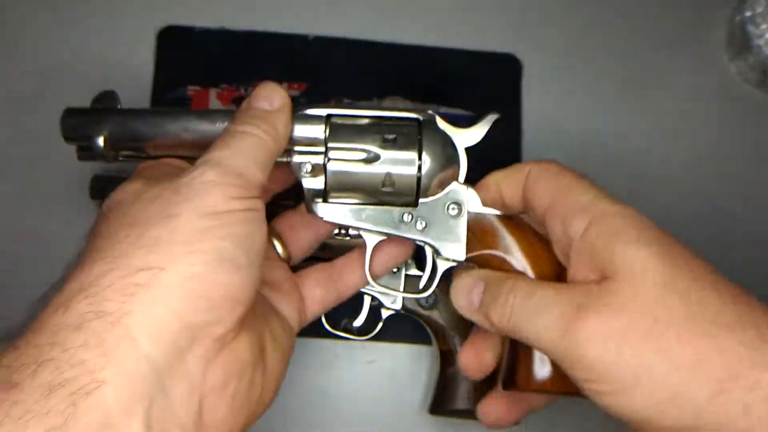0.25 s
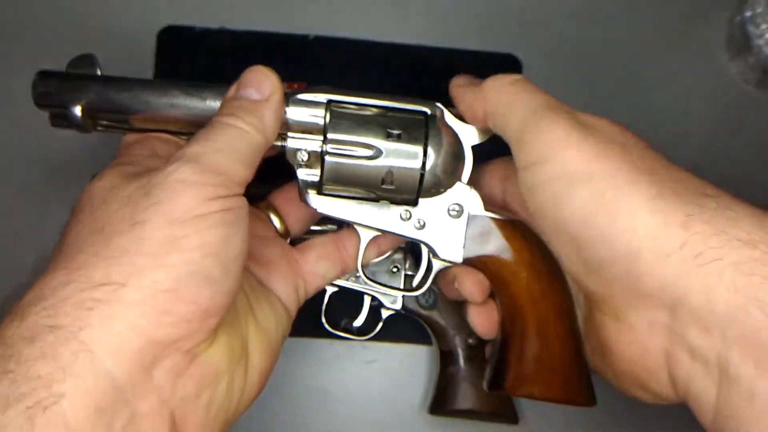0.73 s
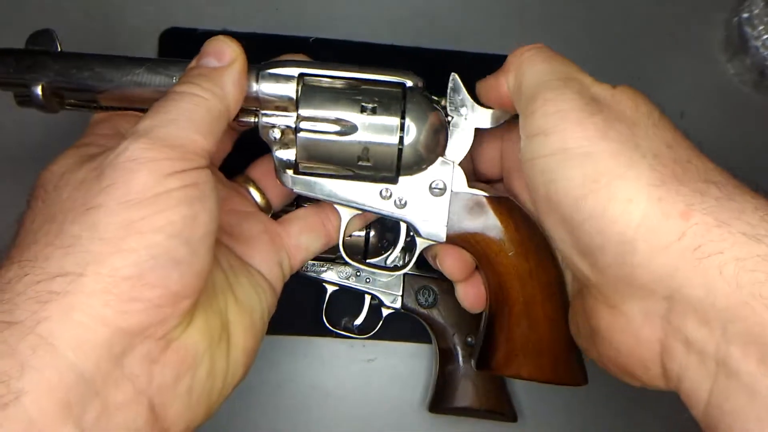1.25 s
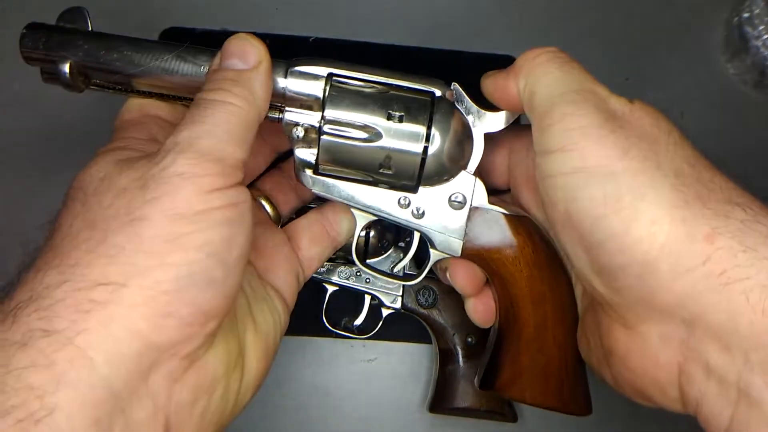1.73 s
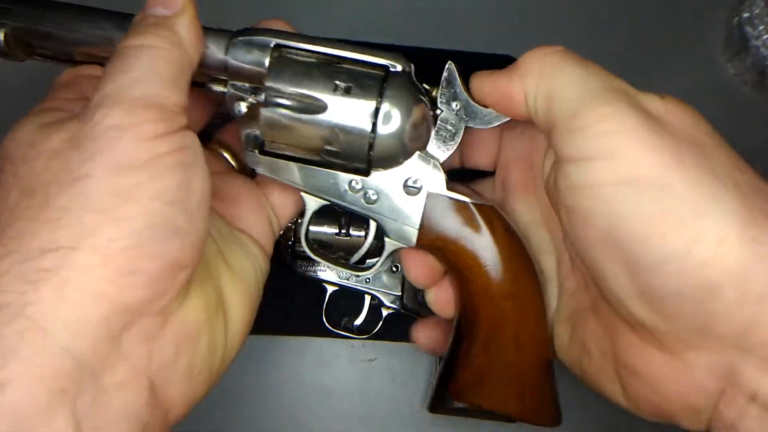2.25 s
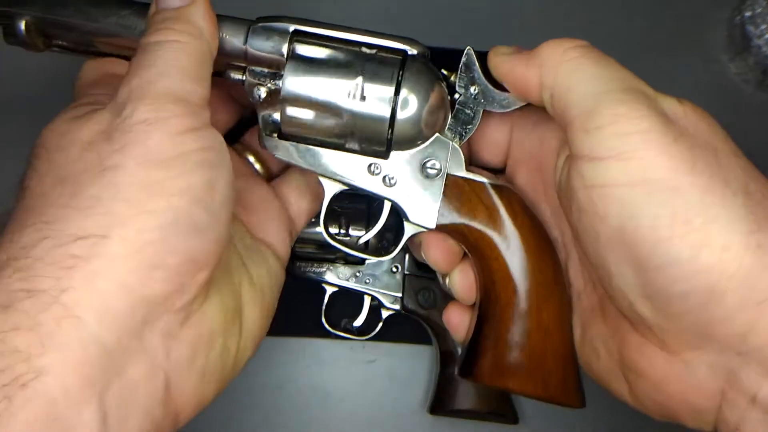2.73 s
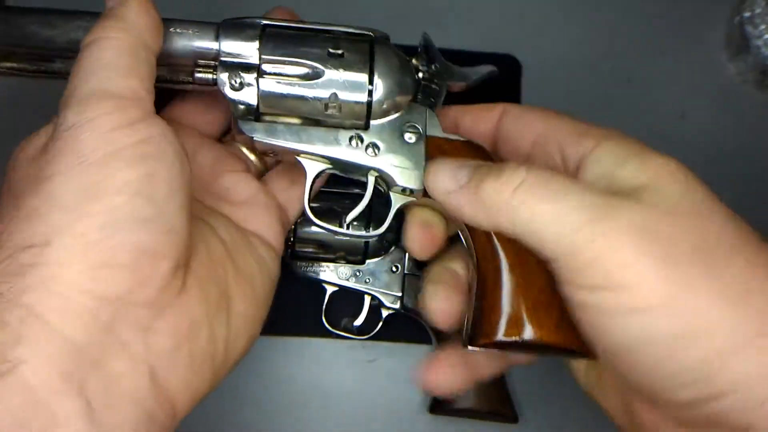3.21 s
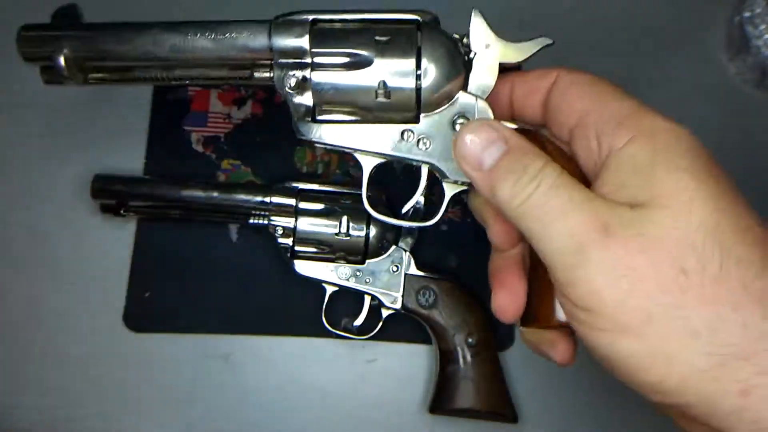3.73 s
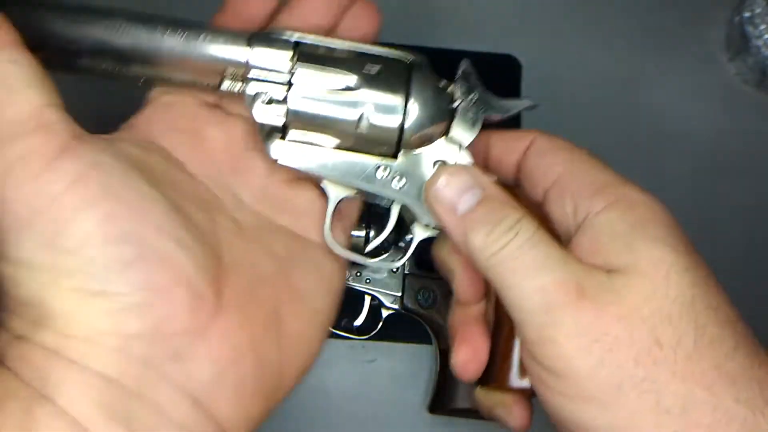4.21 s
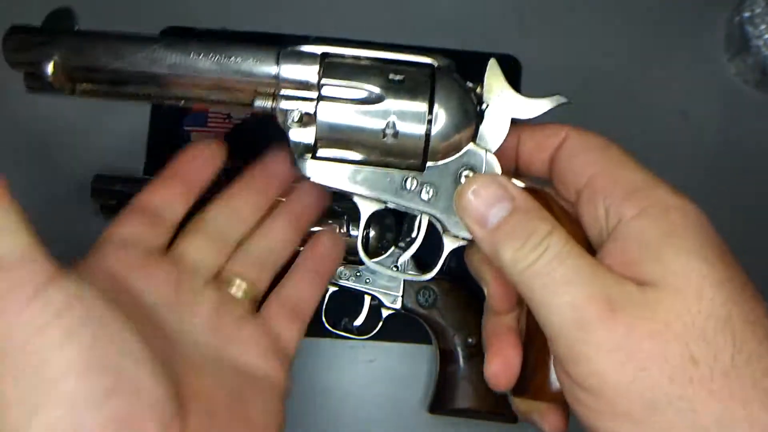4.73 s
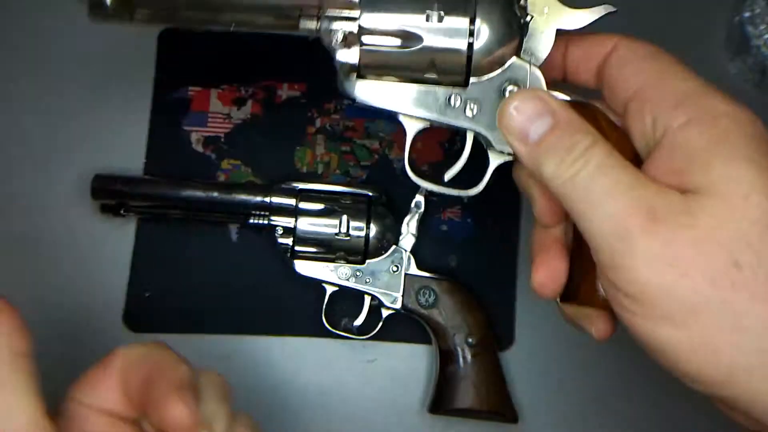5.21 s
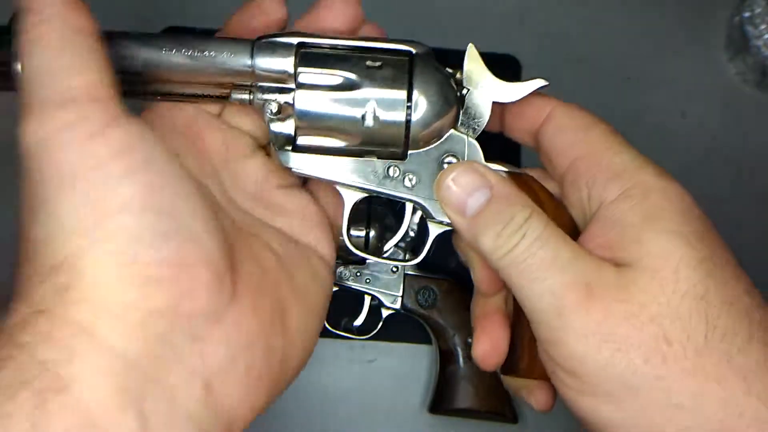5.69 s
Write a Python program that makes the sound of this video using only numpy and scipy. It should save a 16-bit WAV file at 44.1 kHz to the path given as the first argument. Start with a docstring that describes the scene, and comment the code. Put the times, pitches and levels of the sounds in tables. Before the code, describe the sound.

Close metallic clicks of a revolver hammer being cocked notch by notch, then four cylinder spins ticking rapidly and slowing, over low room rumble.

```python
"""A small quiet room, two microphone ports close to a revolver worked by hand over a table.
A rustle with a faint tone dies away first; then the hammer is cocked notch by notch, with faint chirps between.
From 3.5 s the palm spins the cylinder four times, its ratchet ticking slower and slower, among light taps.
Every click is a crack plus ringing steel modes, returned by table and walls over rumble and hiss.
The recorder widens the stereo: each channel gets the other one inverted and late."""
import sys
import numpy as np
from scipy import signal
from scipy.fft import rfft, irfft
from scipy.io import wavfile
from scipy.ndimage import uniform_filter1d

SR = 44100
rng = np.random.default_rng(int(sys.argv[2]) if len(sys.argv) > 2 else 0)


def dump_mix(stems):
    """Bounce the given channels to the path in sys.argv[1] as a 16-bit WAV at rate SR."""
    frames = np.atleast_2d(stems).T  # one column per channel
    limited = np.clip(frames, -1, 1)  # hard clip at full scale
    pcm = np.round(limited * 32767).astype(np.int16)
    wavfile.write(sys.argv[1], SR, pcm)


N = 262832
BLOW_SAMPLES = 4096  # buffer of one click or knock; its second half is silenced


def undb(db):
    """dB to gain."""
    return 10 ** (np.asarray(db) / 20)


def colour(x, points):
    """Filter by (frequency [Hz], gain [dB]) points on a log-frequency axis, -60 dB below the first."""
    hz, db = np.transpose(points)
    f = np.arange(len(x) // 2 + 1) * SR / len(x) + 1
    gain_db = np.interp(np.log(f), np.log(hz), db, left=-60)
    return irfft(rfft(x) * undb(gain_db), len(x))


def even(x, smooth_hz):
    """Keep the fine grain of a noisy burst but flatten its broad spectrum."""
    spectrum = rfft(x)
    power = uniform_filter1d(np.abs(spectrum) ** 2, size=int(smooth_hz * len(x) / SR) + 1)
    return irfft(spectrum * np.sqrt(power.mean() / power), len(x))


def unit(x):
    """Scale to rms 1."""
    return x / np.sqrt(np.mean(x ** 2))


def fade(t, t60):
    """Exponential decay from t = 0, by 60 dB in t60 seconds; silent before."""
    return np.exp(-np.log(1000) * np.maximum(t, 0) / t60) * (t >= 0)


def add(track, s, x):
    """Mix x into track at s seconds."""
    i = int(s * SR)
    track[i:i + len(x)] += x[:len(track) - i]


def revolver():
    """Hammer, ratchet and palm as they reach the two ports."""
    # hammer notches and light taps: (time [s], nominal peak [dB], echo [dB], contact build-up [s],
    # drive of the knock [dB], of the body [dB], of the bright ring [dB], of the top [dB])
    hammer = [(1.015, -27, 2, 0.00085, -12, -6.5, -17.5, -17.5),
              (1.6753, -28.5, -3, 0.0014, -21, -17.5, -22, -15.5),
              (2.3565, -22.5, -6, 0.00057, -29.5, -12.5, -24.5, -25),
              (2.8558, -20, -9, 0.0007, -33, -15.5, -14, -22), (4.212, -54, -2, 0.0015, -11, -12, -26, -27),
              (4.6382, -50.5, -1, 0.00083, -8.5, -16.5, -15, -17),
              (5.35, -53, -4, 0.0012, -1, -14.5, -40, -35)]
    # which of those four drives each drive band of click() follows: (index)
    hammer_follows = [0, 0, 0, 1, 1, 1, 1, 2, 3, 3]
    # offset added in each drive band: (level [dB])
    hammer_shape_db = [-9.5, -2.5, -1, -14, -3.5, 0, -6.5, .1, -2, 1]
    # how a ratchet tooth drives each band: (level [dB])
    ratchet_drive_db = [-35, -39.5, -19.5, -35.5, -8, -10.5, -17, -7.5, -14, -13]

    ports = np.zeros((2, N))
    for s, db, echo_db, rise_s, *drives_db in hammer:
        drive_db = np.take(drives_db, hammer_follows) + hammer_shape_db
        heard(ports, s - .002, click(db, drive_db, rise_s=rise_s), echo_db)
    for s, db in ratchet():
        heard(ports, s - .002, click(db, ratchet_drive_db), 0)
    palm(ports)
    return ports


def click(level_db, drive_db, scatter_db=3.0, crack_db=14.5, crack_t60=0.0078, rise_s=0.00061):
    """A blow of steel on steel, 2 ms into its buffer: a short crack and the modes, each struck unevenly."""
    # drive bands: (frequency [Hz])
    drive_hz = [720, 920, 1100, 1800, 2700, 3300, 4200, 5300, 7500, 13000]
    # steel frame and cylinder before scatter and drive: (frequency [Hz], level [dB], t60 [s])
    steel = [(708, 5.5, 0.019), (960, -6, 0.008), (1121, -2.5, 0.0093), (1305, 1, 0.025), (1797, 5, 0.013),
             (2370, -5, 0.049), (2487, -2, 0.02), (2776, 1, 0.015), (3240, -3.5, 0.024), (3528, -4, 0.027),
             (3984, 1.5, 0.015), (4476, -1.5, 0.032), (4991, 3.5, 0.023), (5510, -9.5, 0.043),
             (5700, 1.5, 0.012), (6050, -3.5, 0.031), (6350, -1.5, 0.03), (6590, 2.5, 0.021),
             (6620, -2, 0.016), (7460, 5, 0.013), (8404, -1.5, 0.016), (9610, -17.5, 0.021),
             (12660, -16, 0.012), (14470, -7, .008), (16300, -15, 0.0123)]
    # spectrum of the crack before the drive: (frequency [Hz], level [dB])
    crack_shape = [(300, -30), (700, 12), (2000, 1), (3000, -1.5), (8200, 5.5), (9200, -5.5), (10800, -8.5),
                   (12200, -5.5), (14400, 2.5), (15500, -3)]
    crest_db = 8  # nominal peak of a click over the rms of its first 300 samples

    t = np.arange(BLOW_SAMPLES) / SR - .002
    swell = np.clip(t / rise_s, 0, 1)  # the contact builds up

    hz, db, t60 = np.transpose(steel)[:, :, None]
    chance = rng.standard_normal((2, len(steel), 1))
    sign = (-1) ** np.arange(len(steel))[:, None]  # neighbouring modes radiate in opposite phase
    mode_hz = hz * (1 + 0.0028 * chance[1])
    strength = sign * undb(db + scatter_db * chance[0])
    modes = strength * np.sin(2 * np.pi * mode_hz * t) * fade(t, t60)

    burst = rng.standard_normal(BLOW_SAMPLES) * fade(t, crack_t60) * swell
    crack = colour(even(burst, 500), crack_shape)

    blow = modes.sum(axis=0) * swell + undb(crack_db) * crack
    drive = [(300, -50), (600, drive_db[0] - 6)] + list(zip(drive_hz, drive_db))
    x = colour(blow, drive) * (t < t[-1] / 2)
    return undb(level_db - crest_db) * x / np.sqrt(np.mean(x[:300] ** 2))


def ratchet():
    """Ticks (time, nominal peak): steady friction slows the free cylinder, so the teeth come further apart."""
    # teeth passed while the palm still drags the cylinder: (time [s], nominal peak [dB])
    pushed = [(3.469, -25), (3.5042, -28), (4.2746, -25.5), (4.335, -28.5), (4.3579, -30), (5.0577, -25),
              (5.0794, -29), (5.8288, -25.5), (5.8486, -27)]
    # the cylinder is let go and coasts to a stop: (time [s], speed [teeth per s])
    coasts = [(3.5233, 67.8), (4.3753, 66.5), (5.0953, 72.25), (5.8634, 43.6)]
    friction = 400  # teeth per s lost each second
    coast_db, tooth_scatter_db = -29.5, 0.76  # mean nominal peak of a coasting tick; unevenness of the teeth

    ticks = list(pushed)
    for s, speed in coasts:
        teeth = np.arange(int(speed ** 2 / (2 * friction)) + 1)
        late_s = (speed - np.sqrt(speed ** 2 - 2 * friction * teeth)) / friction
        tick_db = coast_db + tooth_scatter_db * rng.standard_normal(len(teeth))
        ticks += zip(s + late_s, tick_db)
    return ticks


def palm(ports):
    """Dull knocks of thumb and palm on the frame: short noise bursts, each filtered around one pitch."""
    # (time [s], peak before echoes [dB], centre frequency [Hz])
    knocks = [(1.678, -37, 760), (3.536, -43, 650), (4.379, -47, 415), (5.100, -44, 213),
              (5.862, -48.5, 500)]
    t = np.arange(BLOW_SAMPLES) / SR
    for s, db, hz in knocks:
        burst = rng.standard_normal(BLOW_SAMPLES) * fade(t - .004, 0.036)
        thud = colour(burst, [(hz / 2, -18), (hz, 0), (2 * hz, -18), (8 * hz, -60)])
        knock = undb(db) * thud * (t < t[-1] / 2) / np.abs(thud).max()
        heard(ports, s - .004, knock, -17.5)


def heard(ports, s, x, echo_db):
    """The gun is nearer the left port; the right one hears mostly the room."""
    # off table and walls, before scatter: (delay [s], level at left port [dB], level at right port [dB])
    echoes = [(.0013, -6.5, -37), (.0027, -11.5, -14), (.0046, -11.5, -15), (.0062, -4, -33),
              (.0081, -7.5, -14), (.0095, -11, -28), (0.0115, -13, -12.5), (0.017, -11.5, -21),
              (.0215, -26, -24)]
    delay_s, left_db, right_db = np.transpose(echoes)
    add(ports[0], s, x)
    add(ports[1], s, undb(-26.0) * x)
    add(ports[0], s, undb(echo_db) * signal.fftconvolve(x, room(delay_s, left_db, -27.0, -32)))
    add(ports[1], s, undb(echo_db) * signal.fftconvolve(x, room(delay_s, right_db, -29, -39.5)))


def room(delay_s, echo_db, scatter_db, tail_db):
    """Single echoes over fine scatter and a longer tail thin in the bass; a little different for every blow."""
    t = np.arange(7000) / SR
    tail = colour(rng.standard_normal(len(t)), [(100, -10), (5000, 8.5), (16000, 7.0)]) * fade(t - .004, .12)
    scatter = fade(t - .001, 0.043) * rng.standard_normal(len(t))
    response = undb(scatter_db) * scatter + undb(tail_db) * tail
    chance = rng.standard_normal((2, len(delay_s)))
    echo_at = (delay_s * (1 + .015 * chance[0]) * SR).astype(int)
    response[echo_at] += undb(echo_db + 1.3 * chance[1])
    return response


def chirps():
    """Faint thin glides near 8 kHz: sines whose strength is roughened by slow noise."""
    # (time [s], envelope level [dB], start [Hz], end [Hz], length before the decay [s])
    glides = [(1.344, -74, 7840, 7800, 0.03), (1.437, -81, 7700, 8200, 0.048),
              (1.54, -71, 8400, 8100, 0.026), (1.62, -71, 8400, 8000, 0.039),
              (1.781, -71, 8600, 8460, 0.012), (2.809, -73.5, 7800, 8000, 0.035),
              (2.985, -80, 7660, 8240, 0.042), (3.847, -74, 8900, 8400, 0.019)]
    out = np.zeros(N)
    for s, db, start_hz, end_hz, length in glides:
        n = int((length + 0.042) * SR)
        t = np.arange(n) / SR
        rough = unit(uniform_filter1d(rng.standard_normal(n), 60))
        onset = (t < length) * np.minimum(t / 0.0021, 1)
        decay = np.minimum(t / .006, 1) * fade(t - length, 0.11)
        hz = np.interp(t, [0, length], [start_hz, end_hz])
        phase = 2 * np.pi * np.cumsum(hz) / SR
        add(out, s, undb(db) * (onset + decay) * rough * np.sin(phase))
    return out


def air(shared_hz=250, shared_db=-0.5, right_db=-1.0):
    """Rumble, middle, hiss and rustle as filtered noise; only the deep bass is common to both ports."""
    # spectra of room rumble, middle and microphone hiss: (frequency [Hz], relative level [dB per Hz])
    rumble_shape = [(20, -11), (50, 2.5), (100, 3.5), (200, -3), (500, -11), (1000, -17.5), (1600, -24.5),
                    (2500, -50)]
    middle_shape = [(800, 2), (1700, 2.5), (3000, -1.5), (5000, -8), (8000, -16.5), (11000, -25.5)]
    hiss_shape = [(4000, -10), (7000, -7.5), (10500, -11), (13000, -5), (15500, -2.5)]
    # the rustle dies away at the start: (time [s], level at left port [dB])
    rustle_fall = [(0, -57), (.2, -61), (.35, -70), (.6, -87)]
    # rustle with its faint tone: (frequency [Hz], relative level [dB per Hz])
    rustle_shape = [(700, -11), (1400, -3.5), (1620, -2), (1720, 5.5), (1820, -5.5), (3000, -13),
                    (4500, -16.5), (6000, -41)]
    # rms at the left port when the background stands at 0 dB; the rumble before its shared bass
    rumble_db, middle_db, hiss_db = -53, -66.5, -76.5
    # share of the background's swings in dB
    rumble_follows, middle_follows, hiss_follows = 0.97, 0.69, 0.29

    swing_db = background_db()
    rustle_db = np.interp(np.arange(N) / SR, *np.transpose(rustle_fall))

    def pair(shape):
        """Independent noise for each port."""
        return np.array([unit(colour(rng.standard_normal(N), shape)) for _ in range(2)])

    bass = signal.butter(1, shared_hz, fs=SR, output="sos")
    shared = signal.sosfilt(bass, pair(rumble_shape)[0])
    rumble = pair(rumble_shape) + undb(shared_db) * shared
    out = undb(rumble_db + rumble_follows * swing_db) * rumble
    out = out + undb(middle_db + middle_follows * swing_db) * pair(middle_shape)
    out = out + undb(hiss_db + hiss_follows * swing_db) * pair(hiss_shape)
    out = out + undb(rustle_db) * pair(rustle_shape) * undb([[0], [-5]])
    return out * undb([[0], [right_db]])


def background_db():
    """Level of the background at every sample: a drawn curve that sinks and swells, lower after 2.9 s."""
    # (time [s], level [dB])
    background = [(0, 0.5), (.42, -.5), (.9, -4), (1.3, -0.1), (1.67, 0.3), (1.74, -6.5), (2.3, -0.4),
                  (2.4, -4), (2.72, -0.4), (2.85, 0), (2.9, -10.5), (3.35, -9), (3.44, -5), (3.56, -13),
                  (3.7, -11), (4.33, -7), (4.43, -15.5), (4.7, -11.5), (5.06, -8.5), (5.12, -15),
                  (5.55, -10), (5.85, -9), (5.95, -13.5)]
    return np.interp(np.arange(N) / SR, *np.transpose(background))


def scene():
    """Gun, background and chirps, the chirps 6 dB weaker at the right port."""
    return revolver() + air() + chirps() * undb([[0], [-6]])


def record(dry, cross_bass=0.24, cross_all=0.48, cross_hz=7000):
    """Each channel gets the other one inverted and late, stronger in the bass; an offset; a steep top."""
    cross_lag = 20  # samples
    offset_db = -42  # left channel only, when the background stands at 0 dB; it swings with the background
    top_hz = 15900

    soft = signal.sosfilt(signal.butter(1, cross_hz, fs=SR, output="sos"), dry)
    crossed = cross_bass * soft + cross_all * dry
    late = np.pad(crossed, ((0, 0), (cross_lag, 0)))[::-1, :N]  # channels swapped
    offset = undb(offset_db + background_db()) * np.array([[1], [0]])
    wide = dry - late + offset
    return signal.sosfilt(signal.ellip(8, .2, 70, top_hz, fs=SR, output="sos"), wide)


dry = scene()
out = record(dry)
dump_mix(out)
```